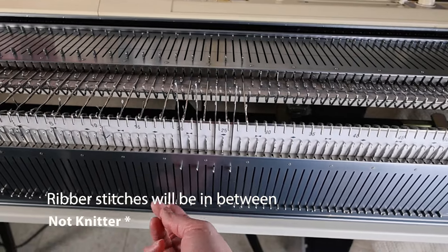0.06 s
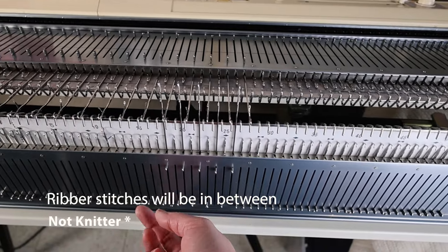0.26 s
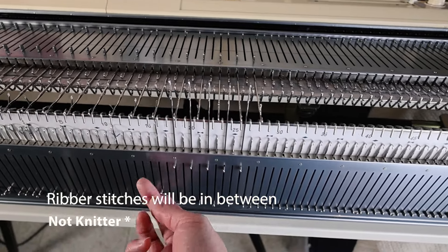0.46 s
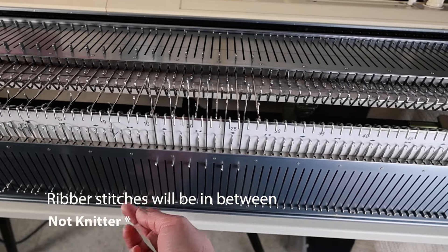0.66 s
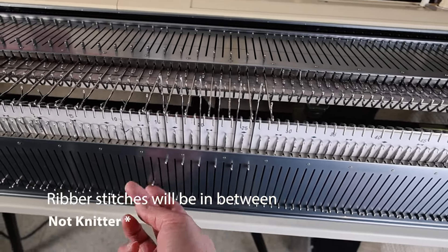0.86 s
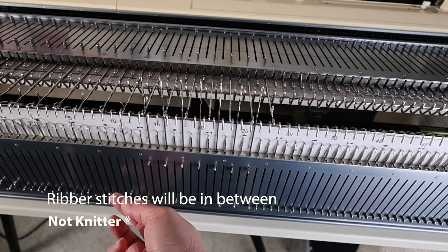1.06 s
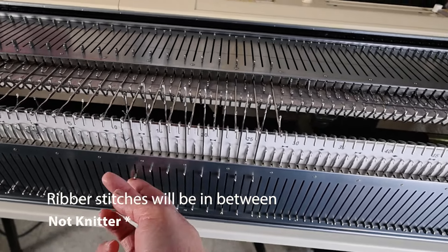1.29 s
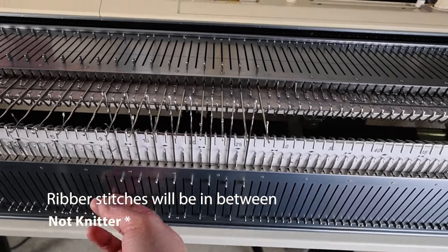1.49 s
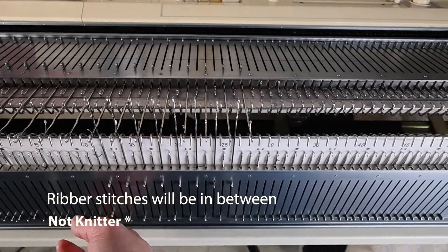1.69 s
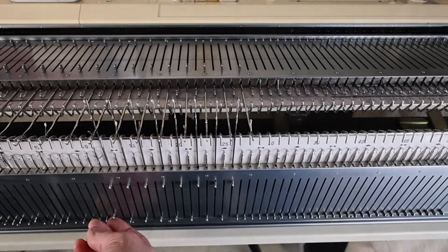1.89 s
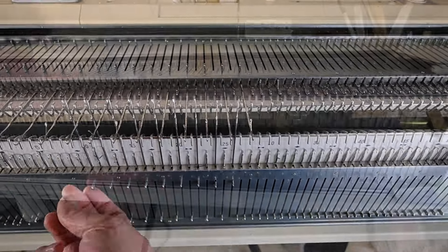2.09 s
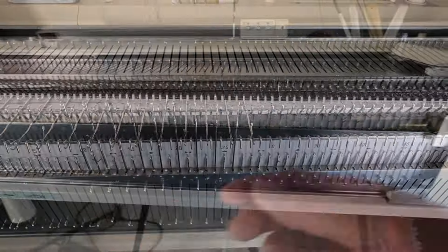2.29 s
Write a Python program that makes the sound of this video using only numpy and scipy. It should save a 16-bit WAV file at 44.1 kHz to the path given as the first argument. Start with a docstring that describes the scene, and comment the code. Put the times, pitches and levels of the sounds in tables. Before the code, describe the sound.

Steel knitting machine needles pushed by hand, scraping briefly and snapping with sharp metallic clicks.

```python
"""The hiss and faint hum of a quiet room, then a knitting machine, close to one mono microphone.
Four steel needles are pushed one by one along its bed. Each is caught with a tick, scrapes along
its slot and snaps against its stop, which rings the bed and the needle itself.
Lighter taps and two brief squeaks of steel on steel fall in between."""
import sys
import numpy as np
from scipy import signal
from scipy.fft import rfft, irfft, next_fast_len
from scipy.io import wavfile

SR = 44100
rng = np.random.default_rng(int(sys.argv[2]) if len(sys.argv) > 2 else 0)


def log_audio(samples):
    """Write samples as a 16-bit WAV file to the path given in sys.argv[1]."""
    # one column per channel
    frames = np.atleast_2d(samples).T
    # limit to full scale, then quantise
    limited = np.clip(frames, -1, 1)
    pcm = np.round(limited * 32767).astype(np.int16)
    wavfile.write(sys.argv[1], SR, pcm)


N = 108045


def undb(db):
    """Decibels to gain."""
    return 10 ** (np.asarray(db) / 20)


def unit(x):
    """Scale to rms 1."""
    return x / np.sqrt(np.mean(x ** 2))


def noise():
    """White noise of rms 1."""
    return rng.standard_normal(N)


def since(start):
    """Seconds since a moment, zero before it."""
    return np.maximum(np.arange(N) / SR - start, 0)


def strike(age, rise, t60):
    """Quickening rise, then a fade of 60 dB every t60 seconds."""
    rise = max(rise, 1 / SR)
    return np.minimum(age / rise, 1) ** 2 * np.exp(-np.log(1000) * np.maximum(age - rise, 0) / t60)


def colour(x, points):
    """Causal filter through (Hz, dB) points."""
    size = next_fast_len(N + 4096)
    hz, db = np.array(points, float).T
    freqs = np.maximum(np.arange(size // 2 + 1) * SR / size, 1)
    gain = undb(np.interp(np.log(freqs), np.log(hz), db))
    cepstrum = irfft(np.log(gain), size)
    cepstrum[1:size // 2] *= 2  # fold to minimum phase: nothing rings ahead of a hit
    cepstrum[size // 2 + 1:] = 0
    return irfft(rfft(x, size) * np.exp(rfft(cepstrum)), size)[:N]


def wavering_tone(hz, width_hz):
    """Noise in one sharp resonance, at rms 1."""
    freqs = np.arange(N // 2 + 1) * SR / N
    resonance = 1 / (1 + (2 * (freqs - hz) / width_hz) ** 2)
    return unit(irfft(rfft(noise()) * resonance, N))


# Colour of the room's hiss. Each row: frequency in Hz, relative level in dB.
HISS_COLOUR = [(30, -74.5), (90, -55), (150, -50), (280, -30), (370, -18.5), (440, -21.5), (520, -11),
               (800, -8.5), (1020, -12), (1250, -8.5), (1480, -11.5), (1750, -6.5), (2150, -10),
               (2600, -17.5), (3200, -14), (3800, -19), (8000, -19.5), (15800, -22.5)]
# Hum in the room. Each row: pitch in Hz, level in dB.
HUM_TONES = [(728, -70.5), (817, -66)]


def room():
    """The quiet room around the microphone: steady hiss, a slightly wavering hum, a soft whine."""
    hum = 0
    for hz, db in HUM_TONES:
        steady = np.sqrt(2) * np.sin(2 * np.pi * hz * since(0))
        hum += undb(db) * unit(steady + .5 * wavering_tone(hz, width_hz=12))
    hiss = undb(-53.5) * unit(colour(noise(), HISS_COLOUR))
    whine = undb(-65) * wavering_tone(1700, width_hz=70)
    return hiss + hum + whine


# Colour of a needle scraping its slot, heard close. Each row: frequency in Hz, gain in dB.
SCRAPE_COLOUR = [(30, -51), (170, -55), (400, -22.5), (850, 10), (1400, -3.5), (2600, 7.5), (3900, -5.5),
                 (5000, 2.5), (5700, 7), (6500, -2), (9500, -1), (12000, -1), (15800, -4)]
# Needles sliding. Each row: start and length in seconds, level before colouring in dB,
# treble gain in dB.
NEEDLE_SLIDES = [(0.186, 0.051, -44, -4), (0.393, 0.052, -53, -17), (0.548, 0.049, -44.5, -4.5),
                 (0.934, 0.028, -42.5, -3), (1.117, 0.072, -52.5, -18), (1.283, 0.066, -49, -6.5),
                 (2.089, 0.0583, -46, 0.5), (2.203, 0.096, -55, 2.5), (2.307, 0.136, -57.5, 2.5)]


def slides():
    """Steel rubs along its slot in tiny random catches and hiss, easing off as it goes."""
    ramp_s, catches_per_s, ease_db_per_s = .0063, 580, -39.5
    catch_power = strike(since(0), rise=0, t60=.014) ** 2
    scrapes = 0
    for start, length, db, treble_db in NEEDLE_SLIDES:
        age = since(start)
        moving = np.clip(np.minimum(age, length + ramp_s - age) / ramp_s, 0, 1)
        catches = (rng.random(N) < catches_per_s / SR) * rng.random(N)
        grit_power = np.abs(signal.fftconvolve(catches, catch_power)[:N])
        grit = unit(noise() * np.sqrt(grit_power))
        rub = unit(grit + .4 * noise()) * moving * undb(db + ease_db_per_s * age)
        scrapes += colour(rub, [(5000, 0), (12000, treble_db)])
    return colour(scrapes, SCRAPE_COLOUR)


# Squeaks along the bed. Each row: start and length in seconds, pitch in Hz, level in dB.
STEEL_SQUEAKS = [(.193, 0.018, 7120, -49.5), (1.221, 0.013, 6980, -48)]


def squeaks():
    """Steel squeaks on steel: a thin, high tone that swells and dies."""
    out = 0
    for start, length, hz, db in STEEL_SQUEAKS:
        swell = np.sin(np.pi * np.minimum(since(start) / length, 1))
        out += undb(db) * swell * wavering_tone(hz, width_hz=270)
    return out


# The five bands of a contact, as centres in Hz: body, clack, edge, sheen and air.
BANDS_HZ = [1100, 2800, 6000, 12000, 15000]


def contact(start, rise, t60, bands_db):
    """Dense chatter of steel on steel with a short diffuse tail."""
    age = since(start)
    chatter = rng.choice([-1, 1], N) * strike(age, rise, t60)
    tail = noise() * undb(-17) * strike(age, rise, t60=.17)
    return colour(chatter + tail, list(zip(BANDS_HZ, bands_db)))


# Colour of taps and snaps on steel, heard close. Each row: frequency in Hz, gain in dB.
STEEL_COLOUR = [(30, -43), (170, -50), (400, -20.5), (780, -8), (1020, -3), (1500, -1), (2050, 8.5),
                (3200, 7), (3900, 1), (5000, 2), (6300, 0), (7200, 3), (9500, -6), (11700, 4),
                (14500, -4.5), (16000, -16)]
# Taps on needles and bed. Each row: start and t60 in seconds, then the five band gains in dB.
LIGHT_TAPS = [(0.2041, 0.033, -23.5, -36, -28, -54, -42), (0.2164, 0.075, -58, -38.5, -38, -35.5, -24),
              (0.376, 0.063, -42, -42.5, -48.5, -42, -33), (0.506, 0.035, -48, -49, -44, -56, -65),
              (0.5396, 0.082, -30.5, -45, -38, -54, -44), (0.56, 0.066, -41, -49, -44, -49, -45),
              (0.74, 0.056, -44, -42.5, -50, -57, -77), (0.7596, 0.084, -37, -45, -47, -51, -44),
              (.841, 0.044, -62, -65, -49, -53, -50), (0.9247, 0.05, -37, -41, -29.5, -50, -46),
              (.929, 0.047, -30, -38.5, -34, -67, -52), (0.939, 0.089, -46, -41, -38, -37.5, -26),
              (1.1146, 0.034, -23.5, -35, -40, -55, -59), (1.127, 0.048, -46, -61, -49, -47, -30),
              (1.2713, 0.043, -38, -36, -48, -51, -66), (1.3965, 0.13, -43, -55, -45, -62, -58),
              (1.6662, 0.058, -33.5, -41.5, -43.5, -51, -63), (1.735, 0.083, -52, -48, -50, -51, -39),
              (1.8506, 0.054, -60, -48, -50, -52, -77), (1.8673, 0.051, -41, -49, -43, -43, -22),
              (2.0587, 0.066, -47, -76, -42.5, -50, -59), (2.0833, 0.057, -36, -44, -34, -44.5, -33),
              (2.131, 0.037, -62, -59, -53, -53, -57)]


def taps():
    """Light touches tick on the steel, too weak to ring the bed."""
    rise_s = .0009
    ticks = sum(contact(start, rise_s, t60, bands_db) for start, t60, *bands_db in LIGHT_TAPS)
    return colour(ticks, STEEL_COLOUR)


# Modes of the needle bed. Each row: frequency in Hz, relative level in dB, t60 in seconds.
BED_MODES = [(2060, -8, .14), (2590, -6, .11), (2800, -8, .11), (2906, -11, .12), (3695, -15, .10),
             (4815, -10, .08), (5122, -13, .10), (7180, -13, .10), (11070, -15, .13), (11730, -13, .10),
             (3170, -4, .145), (3298, -3.5, .165), (3340, -3.5, .16), (3462, -11, .32), (3562, -17, .28)]


def bed_ring(start, rise):
    """The bed rings in decaying modes, struck a little differently each time."""
    age = since(start)
    ring = 0
    for hz, db, t60 in BED_MODES:
        envelope = undb(db + rng.standard_normal()) * strike(age, rise, t60)
        ring += envelope * np.sin(2 * np.pi * (hz * age + rng.random()))
    return ring


# Needles hitting their stops. Each row: start, rise and t60 in seconds, five band gains in dB,
# bed ring gain in dB, then the needle's low and high resonances, each in Hz and dB.
NEEDLE_STOPS = [(0.2401, 0.0043, 0.12, -28, -30.5, -29.5, -25.5, -24.5, -33.5, 8740, -30.5, 11300, -30.5),
                (0.6059, 0.0032, 0.086, -32.5, -30, -26, -32.5, -25, -42, 5770, -34, 13800, -36),
                (0.9735, 0.00115, 0.046, -27.5, -24.5, -24.5, -32, -18, -41.5, 4970, -33.5, 12730, -31),
                (2.1525, 0.0057, 0.076, -34.5, -28, -27.5, -29.5, -24, -39.5, 4320, -33, 11000, -40)]


def stops():
    """Each needle snaps home near the microphone; it rings briefly and the bed rings on."""
    snaps, rings = 0, 0
    for start, rise, t60, *bands_db, bed_db, low_hz, low_db, high_hz, high_db in NEEDLE_STOPS:
        snaps += contact(start, rise, t60, bands_db)
        low = undb(low_db) * wavering_tone(low_hz, width_hz=400)
        high = undb(high_db) * wavering_tone(high_hz, width_hz=400)
        rings += (low + high) * strike(since(start), rise, t60=.043)
        rings += undb(bed_db) * bed_ring(start, rise)
    return colour(snaps, STEEL_COLOUR) + rings


def scene():
    """Machine and room at one close microphone, the same in both channels."""
    mono = stops() + taps() + slides() + squeaks() + room()
    return np.array([mono, mono])


def record(dry):
    """The recorder cuts the top steeply above 15.9 kHz."""
    lowpass = signal.ellip(10, .2, 70, 15900, fs=SR, output="sos")
    return signal.sosfilt(lowpass, dry)


dry = scene()
out = record(dry)
log_audio(out)
```